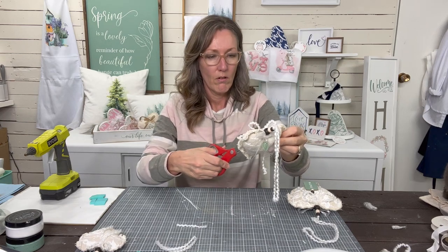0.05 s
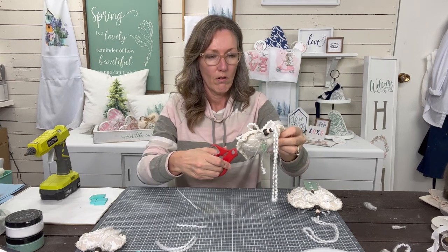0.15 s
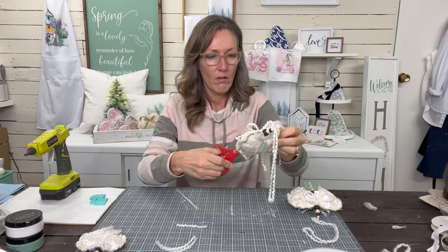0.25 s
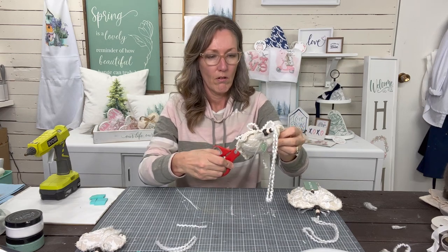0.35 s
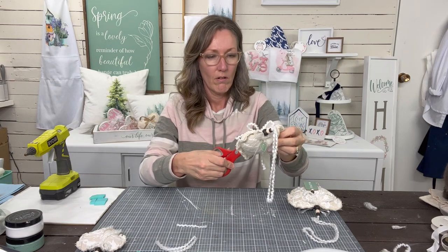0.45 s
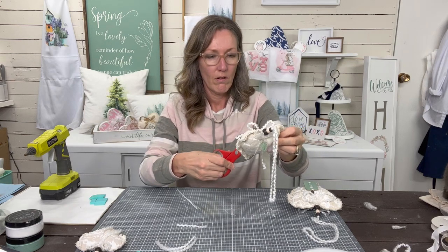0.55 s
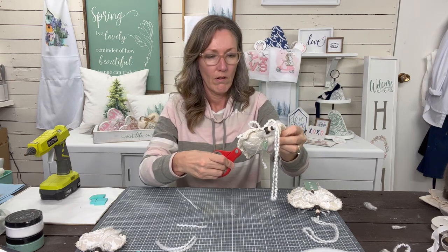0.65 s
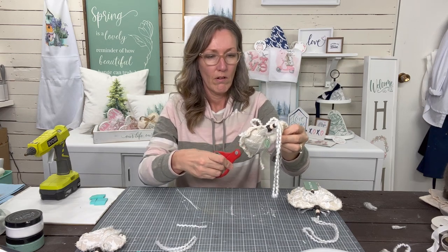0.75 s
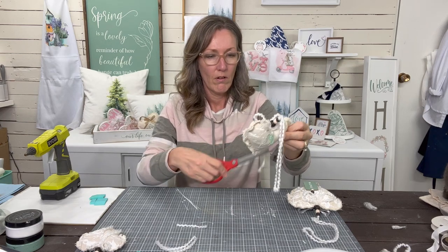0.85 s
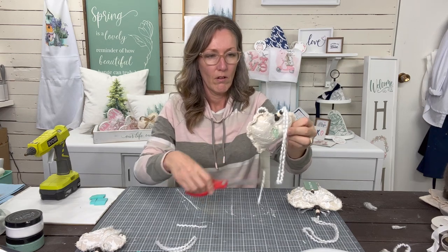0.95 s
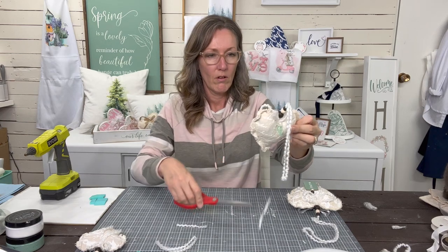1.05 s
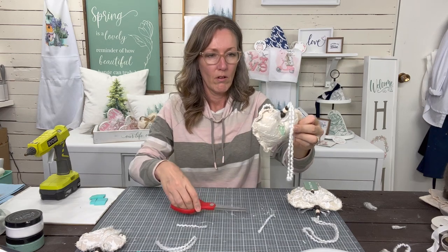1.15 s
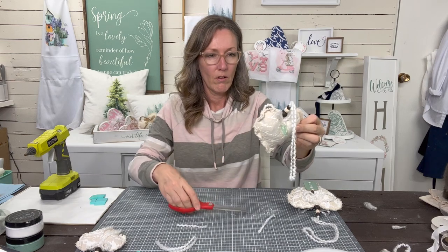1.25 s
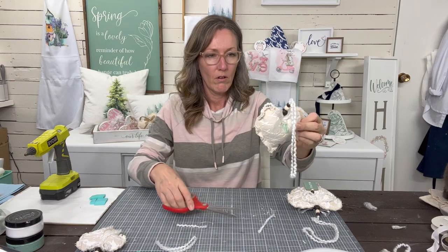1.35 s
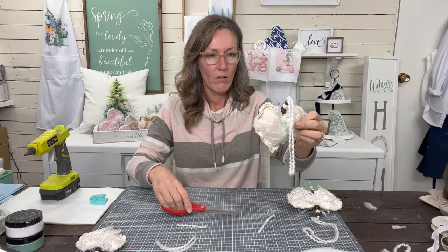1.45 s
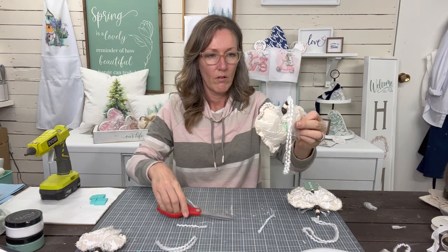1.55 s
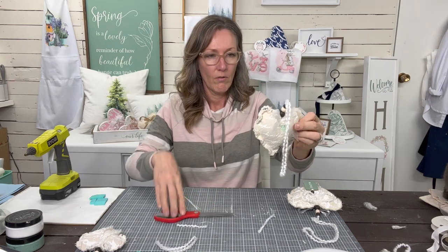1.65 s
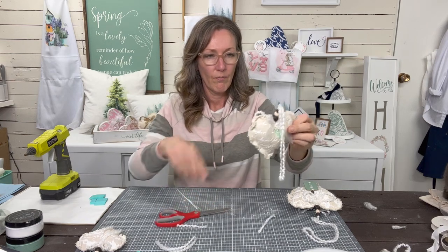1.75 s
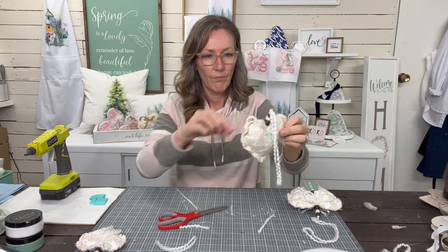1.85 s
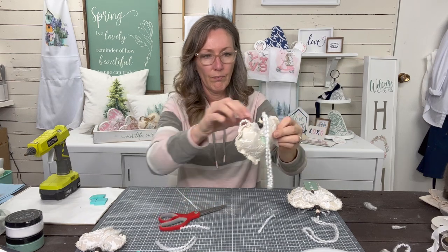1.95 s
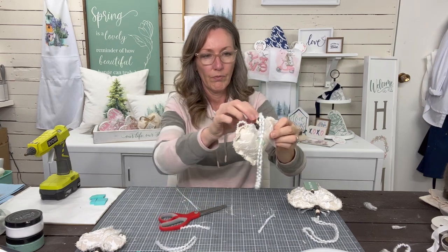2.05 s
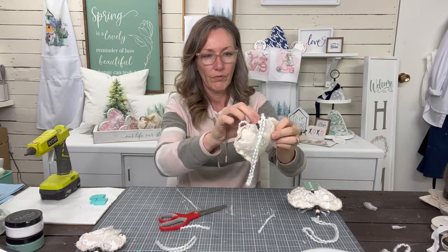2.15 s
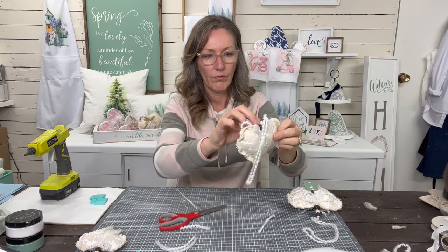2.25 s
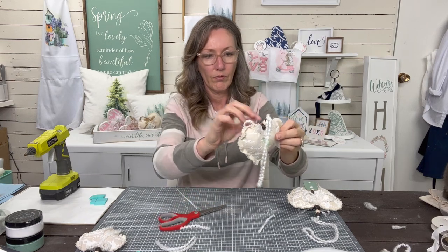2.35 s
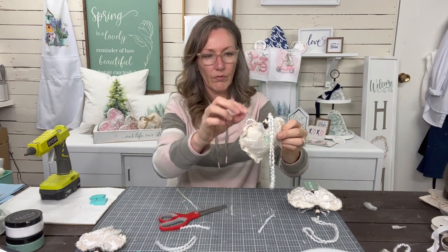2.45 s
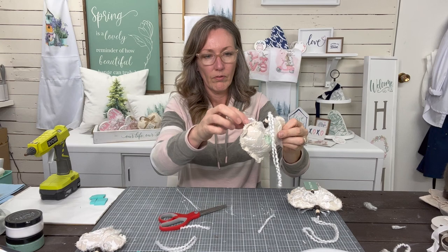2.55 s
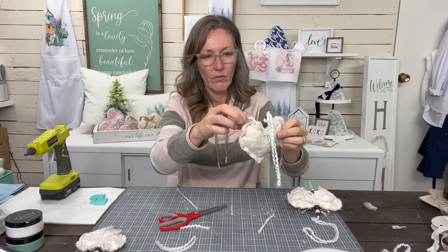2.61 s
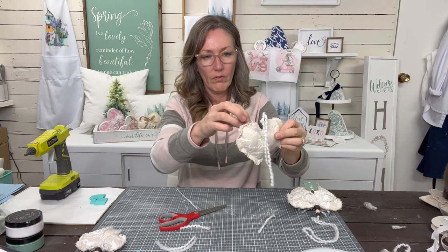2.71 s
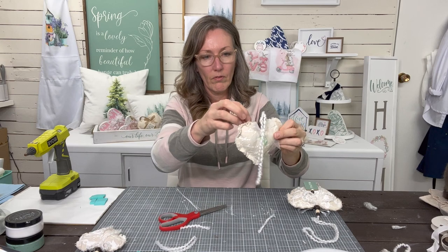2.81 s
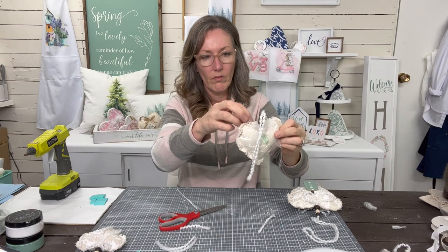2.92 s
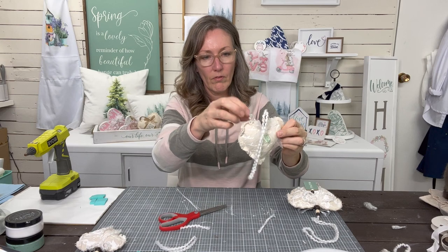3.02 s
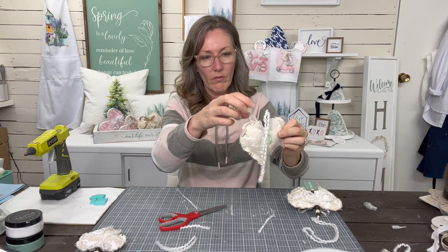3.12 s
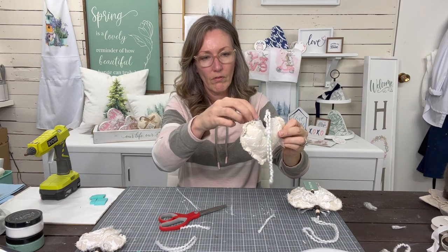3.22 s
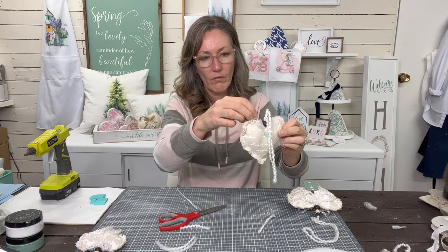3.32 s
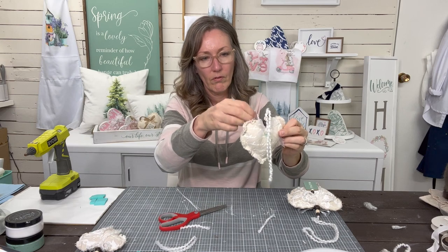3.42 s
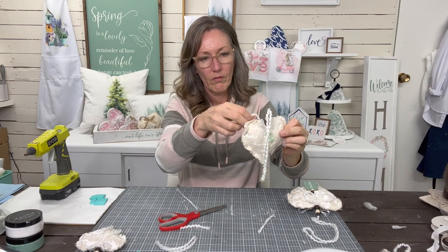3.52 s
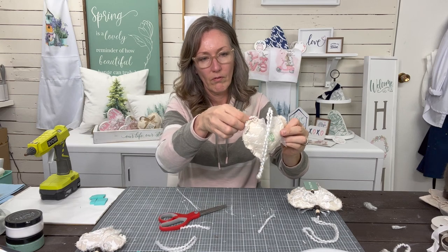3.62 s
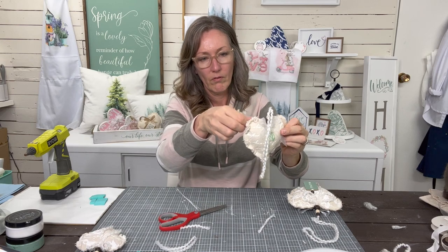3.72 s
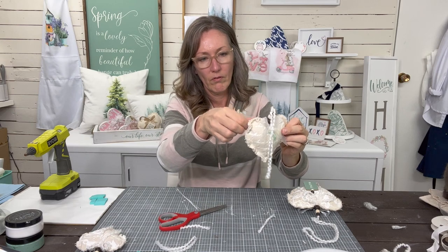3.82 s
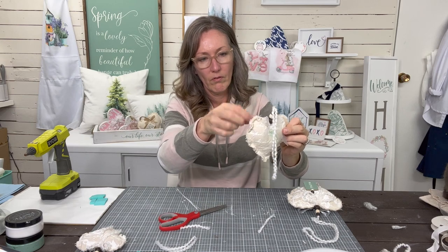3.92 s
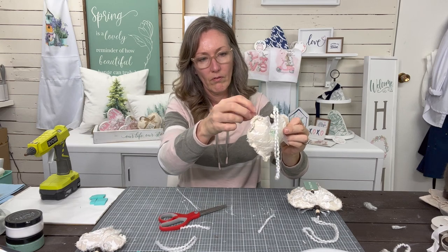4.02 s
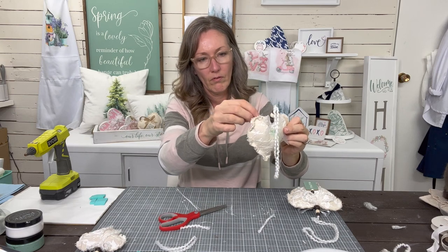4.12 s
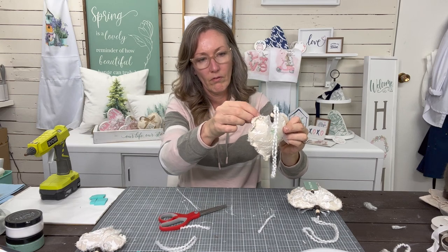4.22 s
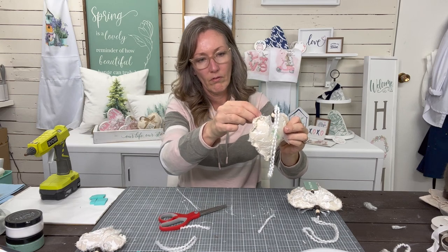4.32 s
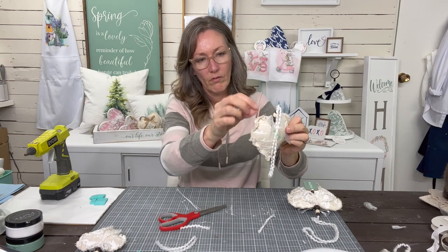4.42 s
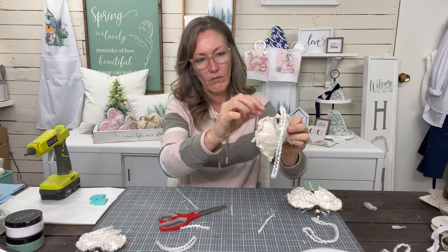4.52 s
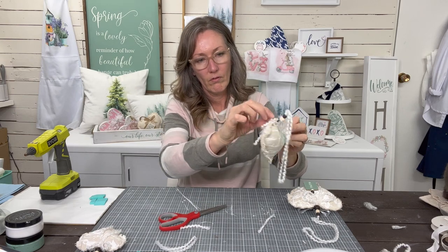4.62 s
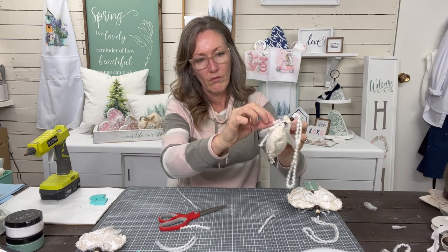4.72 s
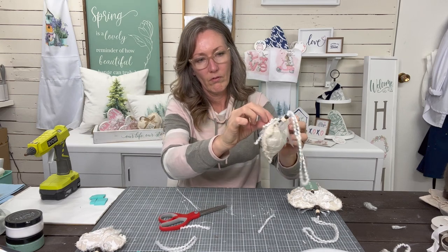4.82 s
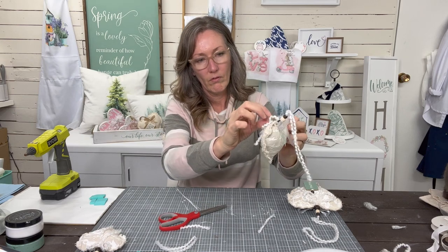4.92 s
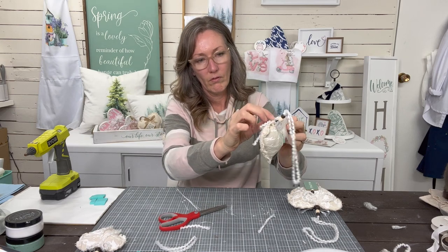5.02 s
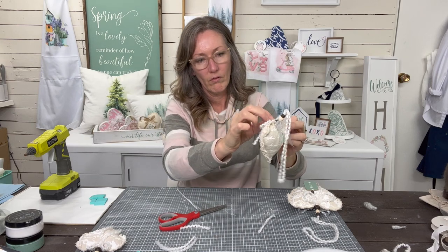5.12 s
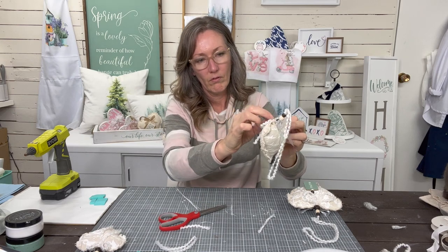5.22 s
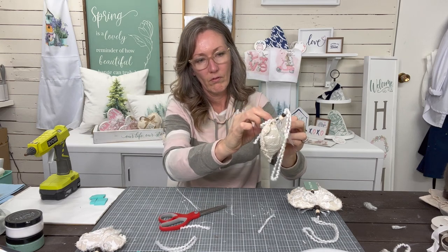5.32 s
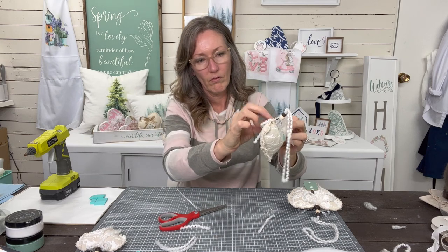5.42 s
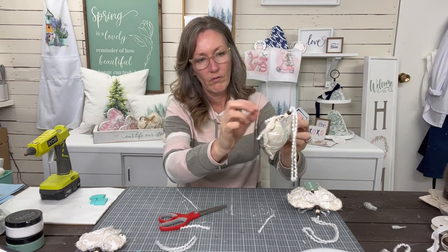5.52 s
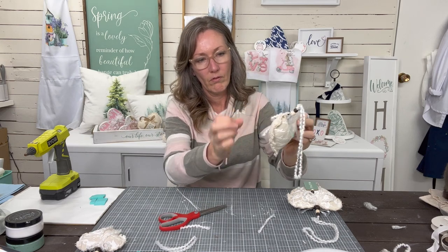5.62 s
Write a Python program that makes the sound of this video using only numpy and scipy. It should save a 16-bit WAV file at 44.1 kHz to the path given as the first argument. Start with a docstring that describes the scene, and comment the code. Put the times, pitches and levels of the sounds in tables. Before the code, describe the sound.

Steady dull air rush and wavering fan hum throughout. A brief squeeze leads to one bright scissor snap with a short ring. After a pause come small ticks and scraping of blade tips on a mat, then an uneven burst of hard clacks and low table thuds as the scissors land. Soft rubbing settles it; only faint fibre rustling follows. Small room, short diffuse echoes, close pickup.

```python
"""Scissors snip a strand of yarn, scrape their tips over a cutting mat and clatter down on a wooden table.
Rubbing is dense random slips shaped by force; knocks are short buzzes that drive ringing modes and colours.
Steel blades ring, plastic handles clack, the table top booms; then fingers work the yarn.
A small room answers with diffuse echoes, over rushing air and wavering hum, at two close microphone ports."""
import sys
import numpy as np
from scipy import signal
from scipy.fft import rfft, irfft
from scipy.io import wavfile

SR = 44100
rng = np.random.default_rng(int(sys.argv[2]) if len(sys.argv) > 2 else 0)


def generate_wav(signal):
    """Clip the signal to [-1, 1] and save it as 16-bit WAV at the path in sys.argv[1]."""
    frames = np.transpose(np.atleast_2d(signal))
    scaled = np.clip(frames, -1, 1) * 32767
    pcm = np.round(scaled).astype(np.int16)
    wavfile.write(sys.argv[1], SR, pcm)


N = 249605
SPECTRUM_SIZE = 2 ** 18  # samples, longer than the scene
T = np.arange(N) / SR
HZ = np.maximum(np.fft.rfftfreq(SPECTRUM_SIZE, 1 / SR), 1)

# Blades pressed against the mat, damped by the grip.
# Each row: mode frequency in Hz, relative level in dB, 60 dB decay time in seconds.
TIP_MODES = [(2450, -7, .008), (4100, -3, .005), (6450, 4, .006), (7400, 0, .005), (8250, 3, .005),
             (10300, -6, .004), (11500, -1, .004), (14100, -1, .004)]


def amp(db):
    """Decibels to gain."""
    return 10 ** (np.asarray(db) / 20)


def at(points, hz):
    """Read (Hz, value) points on a log-frequency axis."""
    point_hz, value = np.transpose(points)
    return np.interp(np.log(np.maximum(hz, 1)), np.log(point_hz), value)


def fade(t60, size):
    """Exponential decay, 60 dB down after t60 seconds."""
    return np.exp(-np.log(1000) * T[:size] / t60)


def unit(x):
    """Scale to unit energy."""
    return x / np.sqrt(np.sum(x ** 2))


def through(x, response):
    """Pass a sound through an impulse response."""
    return signal.oaconvolve(x, response)[:N]


def low_pass(x, cutoff_hz):
    """Dull the sound above the cutoff with a second-order slope."""
    return signal.lfilter(*signal.butter(2, cutoff_hz, fs=SR), x)


def colour(points, size=1024):
    """Causal unit-energy response shaped by (Hz, dB) points, made minimum phase by folding its cepstrum."""
    cepstrum = irfft(np.log(amp(at(points, np.fft.rfftfreq(size, 1 / SR)))))
    cepstrum[1:size // 2] *= 2
    cepstrum[size // 2 + 1:] = 0
    return unit(irfft(np.exp(rfft(cepstrum))))


def ring(modes, size=24000):
    """Struck modes as decaying sines; neighbours swing in opposite directions."""
    out = np.zeros(size)
    for k, (hz, db, t60) in enumerate(modes):
        out += (-1) ** k * amp(db) * fade(t60, size) * np.sin(2 * np.pi * hz * T[:size])
    return out


def add(track, s, sound):
    """Mix a short sound in at time s."""
    i = int(s * SR)
    track[i:i + len(sound)] += sound


def contact(t60, rattle, size=2048):
    """A hard touch followed by a short buzz of tiny rebounds."""
    push = rattle * unit(rng.standard_normal(size) * fade(t60, size))
    push[0] = 1
    return unit(push)


def stroke(s, db, rise_s, fall_s):
    """Force of one rubbing movement: it grows evenly for rise_s up to time s, then loses 20 dB every fall_s."""
    rise = np.clip(1 + (T - s) / rise_s, 0, 1)
    return rise * amp(db - 20 * np.clip((T - s) / fall_s, 0, 10))


def friction(force, grain_db, order=5):
    """Dense slips that follow the rubbing force, with a new random strength every 2 ** order samples."""
    slips = rng.standard_normal(N)
    grains = amp(grain_db * rng.standard_normal(N // 2 ** order + 1))
    slips *= np.repeat(grains, 2 ** order)[:N]
    return slips / slips.std() * force


def snip():
    """Edges squeeze the strand ever harder and bite through it; the blades snap shut and ring briefly."""
    # Blades snapping shut and chattering. Each row: start in seconds, level in dB.
    snaps = [(.5542, 3), (.5548, 12.5), (.5568, 4), (.5602, -4), (.5702, -4), (.5725, -5), (.5820, -7)]
    # Colour of the snap. Each row: frequency in Hz, relative level in dB.
    snap_colour = [(100, -10), (200, -1), (350, -3), (750, -10.5), (1200, -14), (1800, -7.5), (2600, -8.5),
                   (3400, -4.5), (4300, -5.5), (5300, 4.5), (6100, 5), (7200, 5.5), (8500, 3), (9400, 1.5),
                   (11000, -4.5), (13800, -7), (15500, -15)]
    # Ringing steel blades. Each row: frequency in Hz, relative level in dB, 60 dB decay time in seconds.
    blade_modes = [(3408, -5, .1), (5050, -7, .13), (5400, -4, .14), (5840, -3, .14), (6350, -2, .12),
                   (7000, -2, .13), (7600, 2, .14), (8150, 0, .11), (9400, 1, .1), (10200, -7, .08),
                   (14080, -10, .1)]
    cut_s = .5548
    squeeze = stroke(cut_s, db=-45, rise_s=.042, fall_s=.018)
    bite = stroke(cut_s, db=-20.5, rise_s=.003, fall_s=.04)
    push = friction(squeeze + bite, grain_db=3.0)
    for s, db in snaps:
        add(push, s, amp(db) * contact(t60=.003, rattle=.9))
    ringing = through(push, unit(ring(blade_modes)))
    return through(push, colour(snap_colour)) + amp(-13.5) * ringing


def scrape():
    """The tips drag, catch and squeak on the mat, and a blade rings along."""
    # Drags of the blade tips over the mat.
    # Each row: peak in seconds, level in dB, rise in seconds, time to fall 20 dB in seconds.
    drags = [(1.274, -34, .05, .04), (1.378, -38.5, .034, .022), (1.405, -30, .008, .026)]
    # Light ticks of steel and fingernail. Each row: start in seconds, level in dB.
    ticks = [(1.2584, -10.5), (1.2730, -12.5), (1.378, -16), (1.4016, -9), (1.4070, -12), (2.012, -32),
             (2.214, -37.5)]
    # Colour of the sliding tips. Each row: frequency in Hz, relative level in dB.
    slide_colour = [(300, -24), (1100, -15), (1700, -13.5), (2150, -10), (2480, -1), (2900, -6),
                    (3600, -4.5), (4500, -8), (6500, -2), (8500, 0), (10300, 3), (12200, -4), (14200, 1),
                    (16000, -4)]
    push = friction(sum(stroke(*drag) for drag in drags), grain_db=8, order=6)
    for s, db in ticks:
        add(push, s, amp(db) * contact(t60=.008, rattle=2.0))
    sliding = through(push, colour(slide_colour))
    tips = amp(-14) * through(push, unit(ring(TIP_MODES)))
    # one blade mode: 2482 Hz, 60 dB down in 0.09 s
    singing = amp(-19) * through(push, unit(ring([(2482, 0, .09)])))
    return sliding + tips + singing + squeaks()


def squeaks():
    """Narrow, unsteady stick-slip tones that swell, glide and stop."""
    # Squeaks of the dragging tips, gliding as the grip shifts. Each row: start in seconds, length in
    # seconds, start pitch in Hz, end pitch in Hz, rate of random change in Hz, level in dB.
    glides = [(1.234, .018, 3300, 4100, 900, -54), (1.240, .03, 2430, 2530, 200, -47),
              (1.266, .04, 6900, 6100, 700, -45), (1.278, .025, 2560, 2460, 200, -49),
              (1.350, .038, 6100, 6800, 800, -51), (1.401, .012, 4900, 3900, 1200, -40),
              (1.402, .022, 2600, 2450, 250, -46)]
    out = np.zeros(N)
    for s, length_s, start_hz, end_hz, width_hz, db in glides:
        along = np.clip((T - s) / length_s, 0, 1)
        # random strength and phase, joined by straight lines; faster change widens the tone
        knots = np.arange(2 ** 7) / width_hz
        grip = np.interp(T - s, knots, rng.standard_normal((len(knots), 2)) @ [1, 1j])
        turns = np.cumsum(start_hz + (end_hz - start_hz) * along) / SR
        out += amp(db) * np.sin(np.pi * along) * np.real(grip * np.exp(2j * np.pi * turns))
    return out


def landing():
    """Each knock shakes the table, clacks the handles and jolts the blades; returns boom and clatter."""
    # Scissors landing and bouncing. Each row: start in seconds, table level in dB,
    # handle clack level in dB, clack pitch in Hz, steel level in dB.
    knocks = [(1.426, -57, -29, 2998, -21), (1.4744, -49, -19.5, 900, -27),
              (1.4878, -21.5, 1.5, 1300, -2.5), (1.4919, -41.5, -4.5, 1000, -9),
              (1.5110, -41, -9.5, 804, -11), (1.5870, -27, 0, 1920, -5), (1.5910, -25, 2.5, 850, -6.5),
              (1.5962, -26.5, -3, 760.3, -12), (1.6016, -15.5, 10.5, 1701, 13.5),
              (1.6049, -26, 1.5, 1790, 1), (1.607, -24.5, 0.5, 479.2, -9), (1.6130, -22, -6.5, 2400, -2),
              (1.6317, -34.5, -7, 1200, -8.5), (1.6361, -43, -7, 2900, -8.5),
              (1.6902, -39.5, -20, 2100, -32), (1.6978, -46, -14, 1690, -28), (1.7030, -38, -4, 1500, -21),
              (1.7351, -41.5, -20, 1800, -36), (1.741, -58, -22, 1100, -44), (1.828, -58, -30, 1700, -53),
              (1.849, -56, -28.5, 1690, -55)]
    # Colour of the handle clack. Each row: frequency in Hz, relative level in dB.
    clack_colour = [(30, -30), (120, -4), (320, 2.5), (700, 2), (1050, -3.5), (1700, -1), (2500, -1.5),
                    (3400, 0), (4300, -4.5), (5400, -10), (6500, -2), (8300, -4), (9500, -11), (15000, -19)]
    # The handles rattle on as the bounces die away:
    # peak in seconds, level in dB, rise in seconds, time to fall 20 dB in seconds.
    handle_rattle = (1.612, -35, .01, .085)
    table, handles, blades = np.zeros((3, N))
    for s, table_db, clack_db, pitch_hz, steel_db in knocks:
        add(table, s, amp(table_db) * table_ring())
        add(handles, s, amp(clack_db) * clack(pitch_hz, steel_db))
        add(blades, s, amp(steel_db) * contact(t60=.001, rattle=2.0))
    # the table top radiates little of its lowest bass
    boom = signal.lfilter(*signal.butter(2, 54.4, "high", fs=SR), table + thuds() + rumble())
    handles += friction(stroke(*handle_rattle), grain_db=6, order=6)
    # the mat cushions the steel and dulls its top
    steel = low_pass(through(blades, unit(ring(TIP_MODES))), 9500)
    return boom, through(handles, colour(clack_colour)) + steel + rocking()


def table_ring():
    """The table modes vary in strength and pitch, as each knock lands on another spot."""
    # Table top under the mat.
    # Each row: central frequency in Hz, central level in dB, 60 dB decay time in seconds.
    table_modes = [(90.6, -4, .38), (112, -7, .12), (145, -8, .18), (182.8, -5, .26), (243, -6, .17),
                   (318, -1, .09), (330.5, -1, .32), (467, -6, .25), (614, -15, .13), (665, -9.5, .18),
                   (761, -10, .2), (802, -13, .15), (939, -11.5, .22), (1027, -17, .22), (1230, -14, .21),
                   (1275, -14, .18), (1567, -15, .18), (1621, -14, .18), (1830, -14, .2), (2328, -17, .2)]
    spot_db, spot_detune = 3.5, .0038  # standard deviations: level in dB, pitch as a fraction
    modes = []
    for hz, db, t60 in table_modes:
        pitch_chance, level_chance = rng.standard_normal(2)
        modes.append((hz * (1 + spot_detune * pitch_chance), db + spot_db * level_chance, t60))
    return ring(modes)


def thuds():
    """Handles slump softly into the mat: single low modes with a softened start."""
    # Each row: start in seconds, level in dB, pitch in Hz, 60 dB decay time in seconds.
    slumps = [(1.5010, -18, 91, .2), (1.4960, -18, 240, .13), (1.4950, -9.5, 325, 0.1),
              (1.6040, -18, 184, .08), (1.6030, -12.5, 465, .07), (1.6050, -12, 330, 0.059),
              (1.6500, -16, 186, 0.098), (1.7000, -22, 323, 0.18), (1.7500, -29, 175, 0.076),
              (1.6, -36.5, 330, .06), (1.8660, -33, 349, 0.069)]
    out = np.zeros(N)
    for s, db, hz, t60 in slumps:
        thud = ring([(hz, db, t60)])
        add(out, s, thud * np.minimum(T[:len(thud)] / .0017, 1))  # rise in seconds
    return out


def rumble():
    """The table rumbles while the scissors bounce: one swell of low, grainy noise."""
    # The swell: peak in seconds, level in dB, rise in seconds, time to fall 20 dB in seconds.
    swell = (1.665, -27, .05, .125)
    # Colour of the rumble. Each row: frequency in Hz, relative level in dB.
    rumble_colour = [(35, -17.5), (75, -0.5), (115, 0.5), (190, -0.5), (260, -3), (340, -2), (480, -13.5),
                     (1000, -35.5), (4000, -68)]
    return through(friction(stroke(*swell), grain_db=4.0), colour(rumble_colour))


def clack(pitch_hz, steel_db):
    """A plastic handle hits: a short buzz with a broad resonance that depends on where it is struck."""
    # a harder contact is shorter, so its clack is brighter: 0 dB steel adds 1920 Hz to the softest top
    bright_hz = 1620 + 1920 * np.sqrt(amp(steel_db))
    buzz = unit(low_pass(contact(t60=.016, rattle=1.6), min(bright_hz, SR / 2 - 1)))
    body = unit(signal.lfilter(*signal.iirpeak(pitch_hz, Q=2.5, fs=SR), buzz))
    return unit(buzz + amp(-7.5) * body)


def rocking():
    """Handles rub the mat as they rock to rest."""
    # Each row: peak in seconds, level in dB.
    rocks = [(1.739, -34), (1.802, -46), (1.845, -40.5), (1.871, -41.5)]
    # Colour of the rocking. Each row: frequency in Hz, relative level in dB.
    settle_colour = [(60, 4), (350, 14.5), (800, 2.5), (1200, 1.5), (1700, -7), (3000, -27), (8000, -44)]
    force = sum(stroke(s, db, rise_s=.023, fall_s=.024) for s, db in rocks)
    return through(friction(force, grain_db=4.0), colour(settle_colour))


def yarn():
    """The strand slips softly through the fingers with each pull."""
    # Pulls of yarn through the fingers. Each row: peak in seconds, level in dB.
    pulls = [(3.45, -61), (3.77, -65), (4.18, -74)]
    # Colour of the yarn. Each row: frequency in Hz, relative level in dB.
    yarn_colour = [(1000, -25), (2200, -3), (2900, 4), (4500, -2.5), (6500, 0), (8000, -5), (15000, -9)]
    force = sum(stroke(s, db, rise_s=.087, fall_s=.11) for s, db in pulls)
    return through(friction(force, grain_db=1.0), colour(yarn_colour))


def diffuse():
    """Left and right spectra of white noise that arrives from all sides."""
    # Stereo width at the ports. Each row: frequency in Hz, side minus mid level in dB.
    side_over_mid = [(50, -11.5), (130, -3.5), (300, -4), (600, 3), (1500, 0.94), (4000, -1), (8000, 2.5)]
    mid, side = rfft(rng.standard_normal((2, SPECTRUM_SIZE)))
    width = amp(at(side_over_mid, HZ))
    return np.array([mid + width * side, mid - width * side]) / np.sqrt(1 + width ** 2)


def room(build_s, size=2 ** 15):
    """Diffuse echoes that build up quickly and die sooner in the treble."""
    # Room decay. Each row: frequency in Hz, 60 dB decay time in seconds.
    room_decay = [(100, .32), (500, .37), (1500, .345), (3000, .29), (5500, .25), (9000, .195),
                  (14000, .175)]
    noise = rfft(irfft(diffuse())[:, :size])
    hz = np.fft.rfftfreq(size, 1 / SR)
    centres, t60s = np.transpose(room_decay)
    tail = np.zeros((2, size))
    # overlapping bands that crossfade from one centre to the next
    for band, t60 in zip(np.eye(len(t60s)), t60s):
        tail += irfft(noise * at(np.c_[centres, band], hz)) * fade(t60, size)
    build_up = 1 - np.exp(-(T[:size] / build_s) ** 2)
    return np.sqrt(2) * unit(tail * build_up)


def place(x, echoes, lag_ms, pan_db, room_db):
    """Direct sound differs in time and level between the ports; the room's echoes join it."""
    # positive lag delays the right port, positive pan favours the left
    shift = np.exp(-2j * np.pi * HZ * lag_ms / 1000)
    right = irfft(rfft(x, SPECTRUM_SIZE) * shift)[:N]
    direct = np.array([x * amp(pan_db / 2), right * amp(-pan_db / 2)])
    return direct + amp(room_db) * np.array([through(x, side) for side in echoes])


def ventilation(air_db, hum_db, waver_hz):
    """Rush of air with fan and mains lines that waver randomly in strength and phase."""
    # Fan and mains hum. Each row: frequency in Hz, relative level in dB, unsteady share from 0 to 1.
    hum_lines = [(45.8, -56.5, 0.5), (120, -52.5, 0.35), (186.3, -55, 0.6), (213.7, -59, 0.34),
                 (243, -61.5, 0.33), (313.7, -64.5, 0.23), (358.4, -57, 0.4), (556, -68.5, 0.93)]
    hum = np.zeros(N)
    knots = np.arange(0, T[-1] + 1, 1 / waver_hz)
    for hz, db, share in hum_lines:
        chance = (rng.standard_normal((len(knots), 2)) @ [1, 1j]) / np.sqrt(2)
        swing = np.sqrt(1 - share ** 2) + share * np.interp(T, knots, chance)
        hum += np.sqrt(2) * amp(db) * np.real(swing * np.exp(2j * np.pi * hz * T))
    return amp(air_db) * airflow() + amp(hum_db) * hum


def airflow():
    """Rush of air: the low and middle octaves swell and sink on their own, the hiss stays smooth."""
    # Colour of the air. Each row: frequency in Hz, relative level in dB.
    air_colour = [(24, -46), (33, -17.5), (45, -1), (70, 0.5), (190, -2), (340, -6), (560, -7.5),
                  (720, -13), (900, -19), (1250, -26.5), (1600, -22.5), (1800, -22), (2050, -30.5),
                  (2400, -33), (2950, -32), (3350, -29), (3900, -39.5), (5000, -39), (12500, -43.5),
                  (16000, -44.5)]
    noise = diffuse() * amp(at(air_colour, HZ))
    centres = 100 * 2 ** np.arange(6)  # Hz, octaves apart
    bands = [irfft(noise * at(np.c_[centres, band], HZ))[:, :N] for band in np.eye(len(centres))]
    *lows, hiss = bands
    sway_db, sway_hz = 1.5, 6
    air = hiss + sum(low * amp(sway_db * wander(sway_hz)) for low in lows)
    return air / air.std()


def wander(rate_hz):
    """Slow chance: random levels joined by straight lines."""
    return np.interp(T * rate_hz, np.arange(2 ** 9), rng.standard_normal(2 ** 9))


def scene():
    """Snip in the air, scissors on the table, yarn in the hands, over the ventilation."""
    echoes = room(build_s=.0022)
    boom, clatter = landing()
    out = place(snip(), echoes, lag_ms=.045, pan_db=-.8, room_db=-6.3)
    out += place(scrape(), echoes, lag_ms=-.04, pan_db=-.5, room_db=-5.5)
    out += place(boom, echoes, lag_ms=.1, pan_db=-.4, room_db=-9.5)
    out += place(clatter, echoes, lag_ms=.028, pan_db=-.2, room_db=-4.8)
    out += place(yarn(), echoes, lag_ms=.044, pan_db=0, room_db=-14)
    # the ventilation leans to the right
    return out + ventilation(air_db=-48.5, hum_db=1.0, waver_hz=11) * amp([[-.8], [.8]])


def record(dry):
    """Left and right have little in common around 10 to 12 kHz; peaks are clipped and the top is cut."""
    # What left and right share in the treble. Each row: frequency in Hz, gain in dB.
    shared_gain = [(8900, 0), (10100, -12), (12200, -12), (13300, -1.5)]
    mid = irfft(rfft(dry.mean(axis=0), SPECTRUM_SIZE) * amp(at(shared_gain, HZ)))[:N]
    side = (dry[0] - dry[1]) / 2
    # only peaks beyond full scale are clipped
    loud = np.clip([mid + side, mid - side], -1, 1)
    # order 8, 0.2 dB ripple, 70 dB rejection, passing up to 15.7 kHz
    top_cut = signal.ellip(8, .2, 70, 15700, fs=SR, output="sos")
    return signal.sosfilt(top_cut, loud)


dry = scene()
out = record(dry)
generate_wav(out)
```